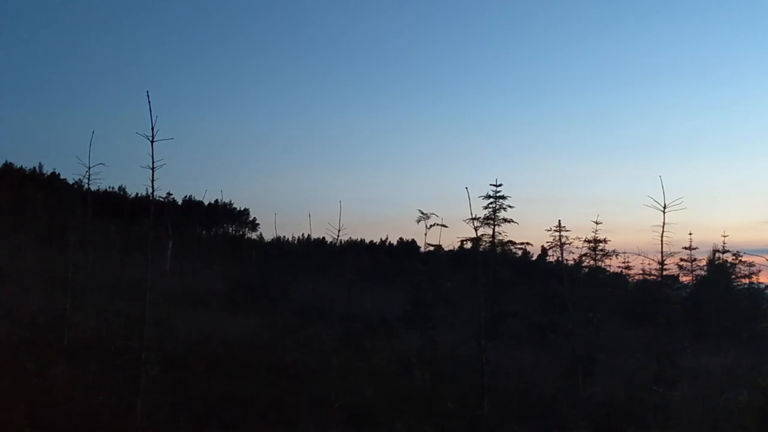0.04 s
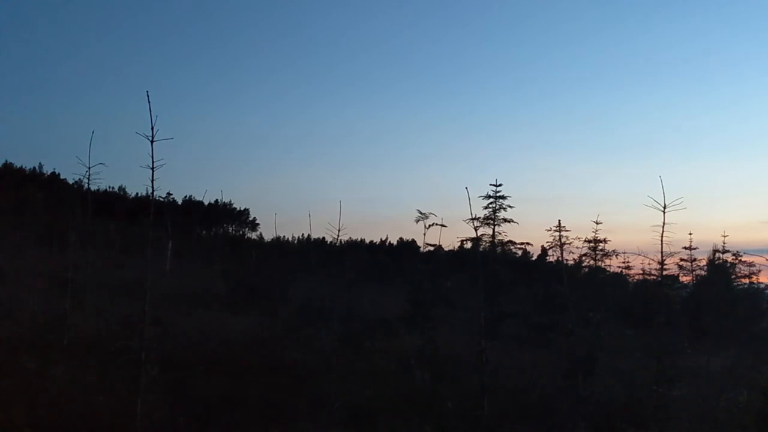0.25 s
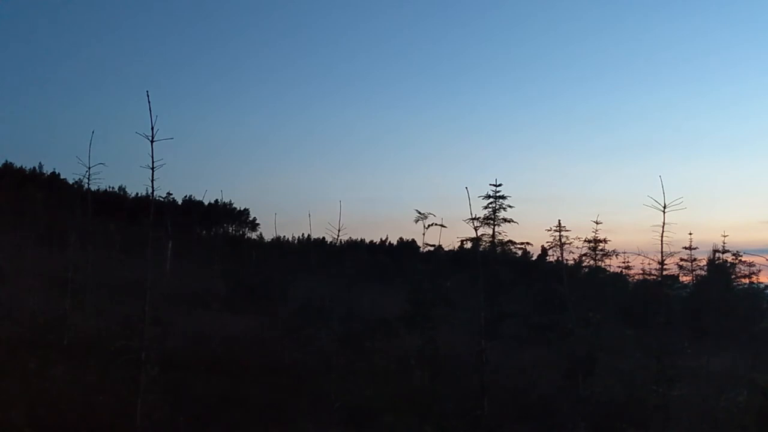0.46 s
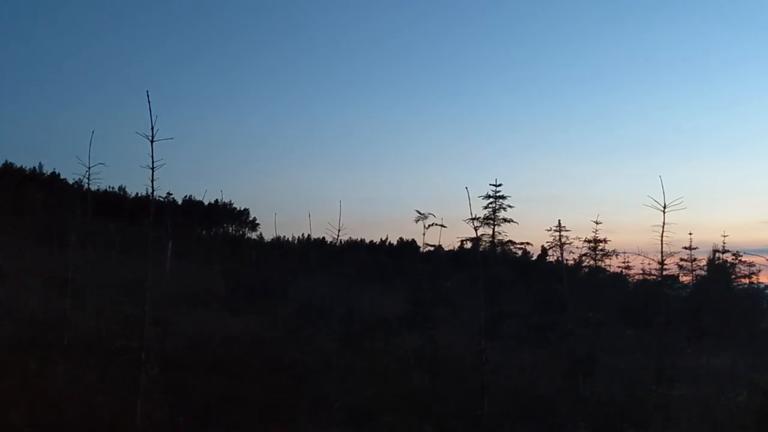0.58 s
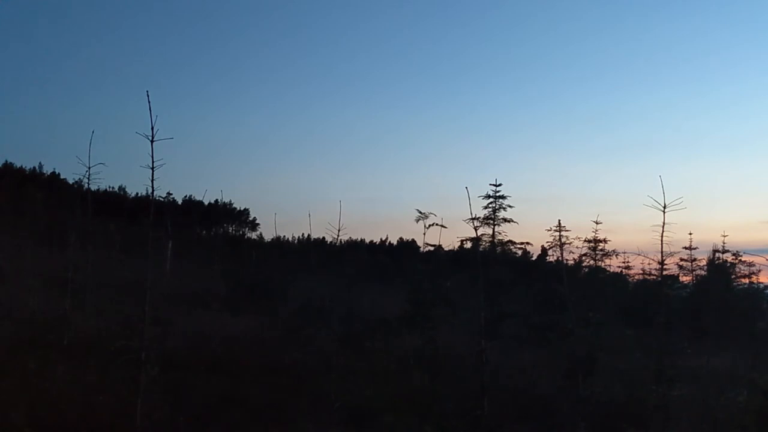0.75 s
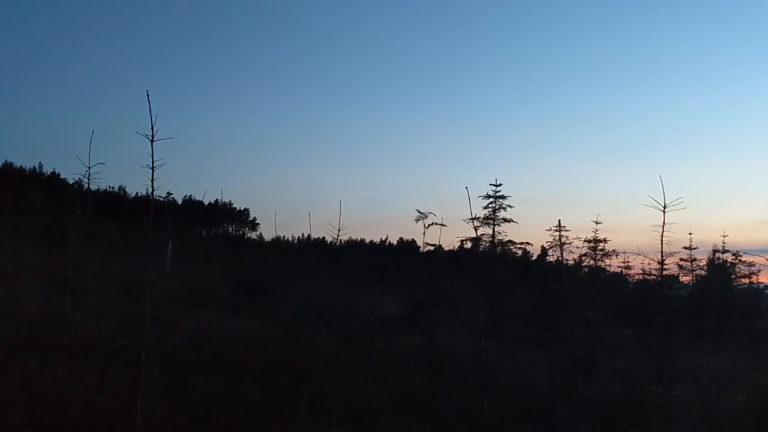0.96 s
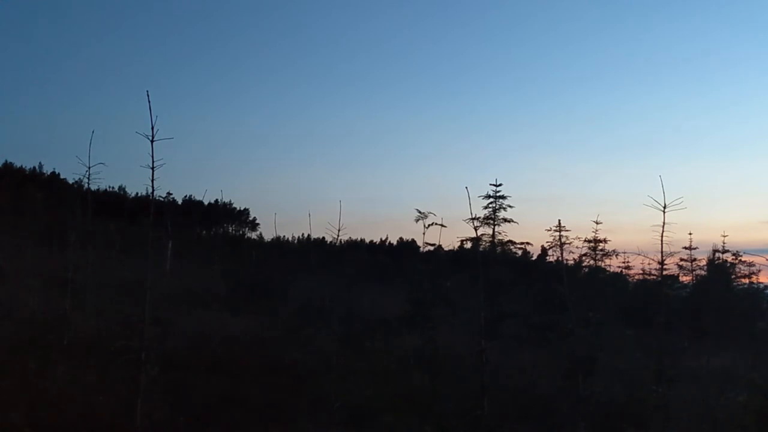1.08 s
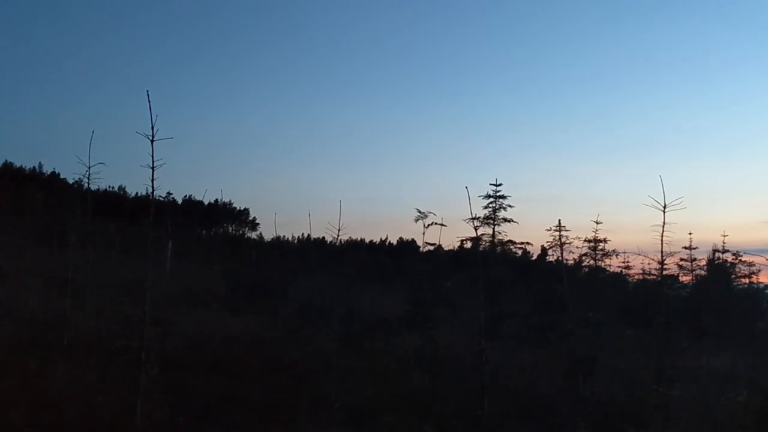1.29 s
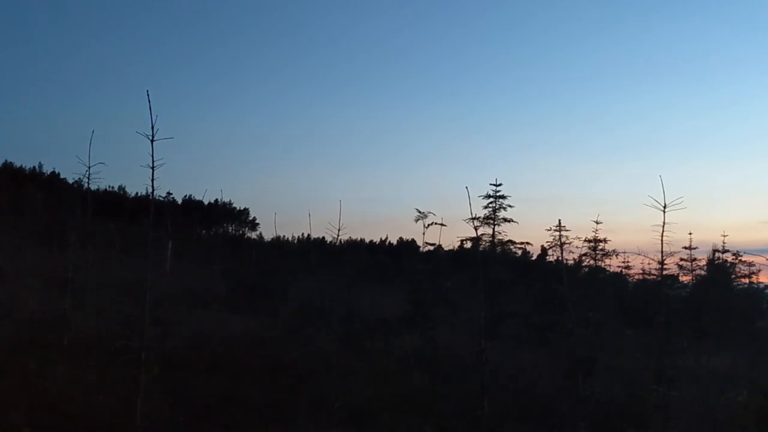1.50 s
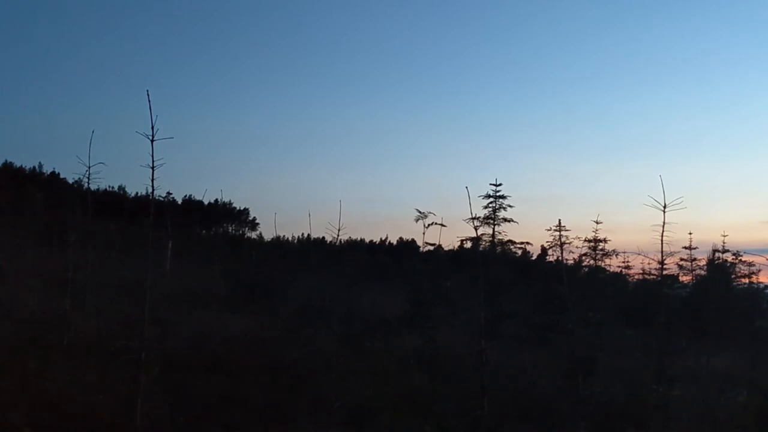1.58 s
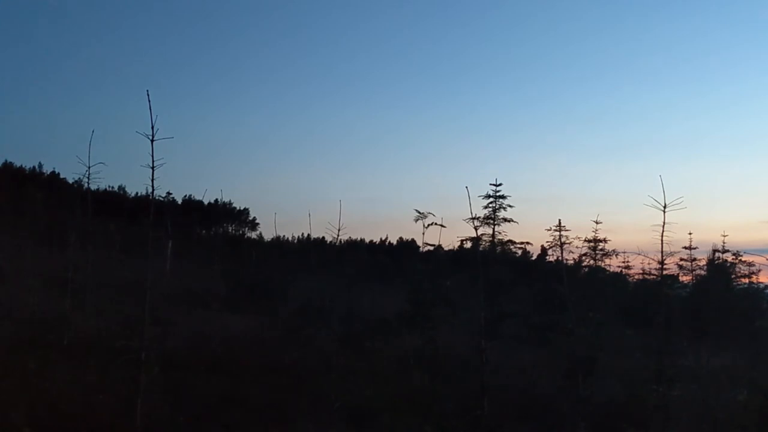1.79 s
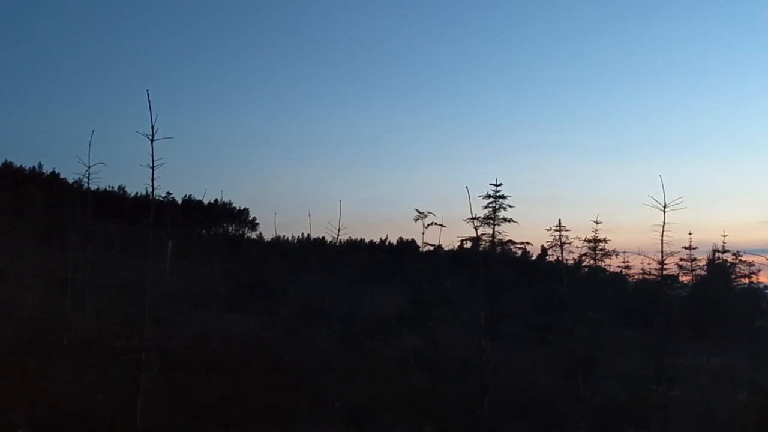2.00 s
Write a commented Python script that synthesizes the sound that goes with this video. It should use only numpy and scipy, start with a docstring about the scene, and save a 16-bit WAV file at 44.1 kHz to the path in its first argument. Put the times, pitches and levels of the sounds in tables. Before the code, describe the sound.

A nightjar churs throughout the two seconds, a quiet, rapid, mechanical trill that grows slightly fuller and echoes lightly among trees. Low wind puffs buffet the microphone's left side, strongest from 0.4 to 0.8 seconds and gone by 1.5. At 0.5 seconds the sound cuts out for an instant and crackles. A faint knock comes near 1.2 seconds, with tiny ticks until 1.8, over soft hiss.

```python
"""A forest clearing at dusk. A nightjar churs: a train of short falling whistles that the trees
scatter back. Puffs of wind buffet the left microphone port with slowing eddies and die away.
The signal drops out once and crackles. A few small ticks and one light knock ring nearby,
over faint air, a brief stir of leaves and microphone hiss."""
import sys
import numpy as np
from scipy import signal
from scipy.fft import rfft, irfft, next_fast_len
from scipy.io import wavfile
from scipy.ndimage import uniform_filter1d, map_coordinates

SR = 44100
rng = np.random.default_rng(int(sys.argv[2]) if len(sys.argv) > 2 else 0)


def master_out(mix):
    """Clip the mix to full scale and print it as 16-bit PCM to the path in sys.argv[1]."""
    frames = np.transpose(np.atleast_2d(mix))
    ceiling = np.clip(frames, -1, 1)
    pcm = np.round(ceiling * 32767).astype(np.int16)
    wavfile.write(sys.argv[1], SR, pcm)


N = 90404

# Pace of the churr, a quick phrase and then a slower one: t/s, notes sung so far
CHURR_PACE = [(.0005, 0), (.0975, 4), (.1296, 5), (.1704, 6), (.2833, 9), (.4702, 14), (.6544, 19),
              (.8028, 23), (1.0275, 29), (1.2142, 34), (1.3975, 39), (1.5875, 44), (1.6975, 47),
              (1.8098, 50), (1.919, 53), (2.0305, 56)]
# Dynamics of the churr, soft and then full: t/s, level/dB
CHURR_LEVEL = [(0, -67.5), (.13, -66), (.22, -62), (.42, -63.5), (.62, -59.5), (.85, -60), (1.05, -59),
               (1.4, -57.5), (1.7, -59), (2.05, -61)]
# One full note, timed around its loudest instant: t/ms, f/Hz, relative level/dB
NOTE_SHAPE = [(-5.5, 2285, -49), (-5, 2270, -7), (-1.5, 1884, -4), (-0.5, 1775, 1.5), (1.68, 1600, -3),
              (2.5, 1297, -11), (6.5, 1150, -19.5), (8.5, 1400, -19)]


def nightjar():
    """Every note is one fast downward whistle; the train of them makes the churr."""
    full_db, shorter_per_db = -59.5, 0.07  # notes softer than full are shorter
    out = np.zeros(N)
    marks, sung = np.transpose(CHURR_PACE)
    times = np.interp(np.arange(sung[-1] + 1), sung, marks)
    ms, pitch_hz, shape_db = np.transpose(NOTE_SHAPE)
    t = np.arange(-SR // 100, SR // 75) / SR
    for s, (bend, accent, stretch) in zip(times, rng.standard_normal((len(times), 3))):
        note_db = np.interp(s, *np.transpose(CHURR_LEVEL))
        time_scale = np.exp(shorter_per_db * min(note_db - full_db, 0) + .06 * stretch)
        hz = np.interp(1000 * t, ms, pitch_hz) * (1 + 0.013 * bend)
        envelope_db = np.interp(1000 * t / time_scale, ms, shape_db, left=-np.inf, right=-np.inf)
        rough_db = 1.5 * wobble(t - t[0], rate=500)
        level = amp(note_db + envelope_db + 0.1 * accent + rough_db)
        add(out, s + t[0], level * np.sin(2 * np.pi * np.cumsum(hz) / SR))
    return out


def clearing(bird):
    """The direct sound reaches both ports; near trunks scatter it at once, the far trees for longer."""
    lead_s = np.array([[.5], [-.5]]) * 0.13e-3  # the left port hears it first
    direct = pan(db=-1) * filtered(bird, lambda hz: np.exp(2j * np.pi * hz * lead_s))
    near_trunks = amp(-17.5) * scatter(bird, t60=.04, predelay_s=.004)
    far_trees = amp(-10) * scatter(bird, t60=.58, predelay_s=.004)
    return direct + near_trunks + far_trees


def scatter(x, t60, predelay_s):
    """Many small reflections blur into a diffuse stereo tail at about unity gain."""
    t = np.arange(SR // 2) / SR
    tail = rng.standard_normal((2, len(t))) * amp(-60 * t / t60) * (t > predelay_s)
    return signal.fftconvolve(x[None], tail / np.linalg.norm(tail[0]), axes=1)[:, :N]


# Wind hits on the left port: t/s, level/dB, length/s, starting eddy rate/Hz
PUFF_HITS = [(0.012, -48, 0.098, 166.4), (0.057, -44, 0.036, 129.6), (.181, -43.5, 0.041, 182.6),
             (0.198, -35.5, 0.056, 126), (.238, -41.5, 0.051, 160), (0.267, -37.5, 0.034, 222),
             (0.328, -35, 0.068, 202), (0.369, -44.5, 0.068, 234), (0.394, -33.5, 0.0078, 375),
             (0.407, -26.5, 0.011, 318), (0.418, -38.5, 0.089, 145.3), (0.526, -21.5, 0.015, 129),
             (0.541, -36, 0.037, 274.4), (0.559, -27, 0.046, 142.6), (0.572, -41, 0.074, 291),
             (0.623, -35.5, 0.035, 257), (.651, -24, 0.034, 306), (.67, -23.5, 0.037, 148.7),
             (0.691, -32, 0.032, 284), (0.712, -25, 0.036, 205), (0.745, -35.5, 0.062, 270),
             (0.76, -31, 0.066, 139), (0.863, -42, 0.042, 225), (.871, -46, 0.032, 278),
             (.886, -36.5, 0.031, 125), (0.969, -48.5, 0.054, 231), (1.02, -51.5, 0.08, 158),
             (1.111, -35.5, 0.035, 231.5), (1.149, -43.5, 0.04, 204), (1.185, -47.5, 0.083, 115.7),
             (1.231, -48.5, 0.13, 184), (1.286, -55, 0.014, 240), (1.295, -36.5, 0.028, 121),
             (1.36, -41, 0.05, 110.7), (1.412, -47.5, 0.035, 125.5)]
# Colour of the fine turbulence on hard hits: f/Hz, relative level/dB
SPRAY_EQ = [(150, -20), (400, 7), (600, -5.5), (950, -17), (1400, -36), (3000, -46), (8000, -49),
            (15000, -41)]


def puffs():
    """Each puff is a short run of uneven eddies that slow down as it dies; hard ones add a spray."""
    attack_s, fall_db = 0.0074, 22.5  # the fall is reached after one length
    end_hz, sag_s, wobble_hz = 96.7, 0.0471, 264.5
    thumps, force, t = np.zeros(N), np.zeros(N), np.arange(SR // 4) / SR
    for s, db, length, first_hz in PUFF_HITS:
        hz = end_hz + (first_hz - end_hz) * np.exp(-t / sag_s)
        start_cycles = rng.random()
        uneven_hz = hz * np.exp(0.19 * wobble(t, wobble_hz))
        phase = 2 * np.pi * (start_cycles + np.cumsum(uneven_hz) / SR)
        rise = np.sin(np.pi / 2 * np.minimum(t / attack_s, 1)) ** 2
        level = rise * amp(db - fall_db * (t / length) ** 2 - 0.5 * wobble(t, wobble_hz))
        add(thumps, s, level * (np.sin(phase) + amp(-33) * np.sin(2 * phase)))
        add(force, s, level * (hz / (2 * end_hz)) ** 2)
    hardness = force / amp(-30)  # 1 in a hard puff
    spray = amp(-63.5) * hardness ** 1.63 * noise(SPRAY_EQ)[0]
    return thumps + spray


# Swell of the rumble under the puffs: t/s, relative level/dB
RUMBLE_SWELL = [(0, -49.5), (.14, -54.5), (.22, -51), (.42, -42.5), (.5, -51.5), (.56, -46), (.62, -42.5),
                (.68, -49), (.79, -45.5), (.84, -58.5), (.89, -39), (.95, -60.5), (1.15, -48.5),
                (1.38, -54), (1.48, -77), (1.58, -79), (1.66, -57), (1.76, -69), (2.05, -66)]
# Colour of that rumble: f/Hz, relative level/dB
RUMBLE_EQ = [(20, -22), (45, 1.5), (70, 13.5), (120, 0), (220, -13), (330, -33), (480, -42), (800, -36),
             (1200, -53), (2000, -90)]
# Swell of the murmur on the sheltered right port: t/s, level/dB
MURMUR_SWELL = [(0, -63.5), (.24, -65), (.32, -104), (.4, -56), (.52, -70), (.65, -60), (.7, -62),
                (.75, -62), (.86, -79), (.94, -54), (1.0, -75.5), (1.5, -80), (2.05, -76)]
# Colour of that murmur: f/Hz, relative level/dB
MURMUR_EQ = [(25, -19.5), (55, 3.5), (85, 13.5), (140, -0.5), (250, -34), (600, -44)]


def wind():
    """Puffs thump on the left port over a low rumble; the right port only murmurs."""
    left = puffs() + amp(curve(RUMBLE_SWELL) - 4.5) * eddies(RUMBLE_EQ)
    right = amp(curve(MURMUR_SWELL)) * eddies(MURMUR_EQ)
    return np.array([left, right])


def eddies(spectrum, window=900):
    """Low turbulence, levelled to an even strength."""
    turbulence = noise(spectrum)[0]
    power = uniform_filter1d(uniform_filter1d(turbulence ** 2, window), window)
    return turbulence / np.sqrt(abs(power) + 1e-9)


# Jumps of the left signal: t/s, level/dB
CRACKLE_HITS = [(0.5219, -37.5), (0.5296, -33.5), (0.5348, -39), (0.538, -28.5), (1.511, -53)]


def crackles():
    """Each crackle is a sudden step that sinks back to rest, with only a trace on the right."""
    decay_s = 0.0041
    left, t = np.zeros(N), np.arange(SR // 20) / SR
    for s, db in CRACKLE_HITS:
        add(left, s, amp(db) * np.exp(-t / decay_s))
    return np.array([left, amp(-38) * left])


# Small dry ticks: t/s, level/dB, f/Hz, t60/s, snap against ring/dB, left minus right/dB
TICK_HITS = [(1.1658, -71, 8160, 0.016, -8, -6), (1.3372, -62.5, 6000, 0.021, -13, 8),
             (1.4616, -67.5, 1265, 0.01, -4, 3), (1.513, -64, 1360, 0.0059, 4, 3),
             (1.5385, -62, 8430, 0.0076, 0, 3), (1.54, -62.5, 1710, .012, -8, 2),
             (1.808, -60, 8300, 0.0059, 0, -2)]
# Ring of a tick: pitch ratio, relative level/dB
TICK_RING = [(1, 0.5), (1.07, -6), (1.16, -5), (1.25, -18)]
# Ring of the knock: f/Hz, relative level/dB, t60/s
KNOCK_RING = [(464, -4, 0.055), (853, 10, 0.019), (995, 3, 0.018), (1580, 2, 0.0099), (2230, 2, 0.009)]


def ticks_and_knock():
    """Dry ticks and one light knock ring close to the microphone, their top end rolled off."""
    top_hz, knock_s = 11000, 1.1652
    out = np.zeros((2, N))
    for s, db, hz, t60, snap_db, pan_db in TICK_HITS:
        modes = [(hz * ratio, mode_db, t60) for ratio, mode_db in TICK_RING]
        add(out, s, amp(db) * pan(pan_db) * ring(modes, snap_db, snap_t60=0.013, snap_hz=hz))
    add(out, knock_s, amp(-63) * ring(KNOCK_RING, snap_db=0, snap_t60=.008, snap_hz=1200))
    return filtered(out, lambda hz: 1 / np.sqrt(1 + (hz / top_hz) ** 20))


def ring(modes, snap_db, snap_t60, snap_hz):
    """Damped modes with a brief snap of noise around snap_hz."""
    t = np.arange(SR // 10) / SR
    tone = sum(amp(db - 60 * t / t60) * np.sin(2 * np.pi * hz * t) for hz, db, t60 in modes)
    band_hz = snap_hz * 2 ** np.array([-0.2, 0.2])
    snap = signal.lfilter(*signal.butter(1, band_hz, "band", fs=SR), rng.standard_normal((2, len(t))))
    return tone + amp(snap_db - 60 * t / snap_t60) * unit(snap)


# Swell of the distant air: t/s, level/dB
AIR_SWELL = [(0, -78), (1.35, -75), (1.52, -71.5), (2.05, -70.5)]
# Colour of the air: f/Hz, relative level/dB
AIR_EQ = [(25, -8), (90, 5), (180, -2.5), (290, -2.5), (450, -11.5), (800, -17.5), (1500, -19.5),
          (3000, -24), (6000, -54)]
# Swell of the leaves: t/s, level/dB
LEAF_SWELL = [(0, -95), (.55, -92), (.68, -80.5), (.76, -78), (.85, -93), (1.05, -95), (2.05, -96)]
# Colour of the leaves: f/Hz, relative level/dB
LEAF_EQ = [(500, -22), (900, -2), (2500, -4), (7000, -4), (11000, -6.5), (15000, -16)]


def air_and_leaves():
    """A faint bed of air in the trees; leaves stir briefly in the strongest gust."""
    air = amp(curve(AIR_SWELL)) * noise(AIR_EQ, channels=2)
    leaves = amp(curve(LEAF_SWELL)) * pan(db=2.5) * noise(LEAF_EQ, channels=2)
    return air + leaves


# Colour of the hiss, played without its first and last rows: f/Hz, relative level/dB
HISS_EQ = [(1650, -31), (2800, 0.5), (3260, 1.5), (3850, 0), (4130, 0.5), (5320, 0), (7050, 2.5),
           (10700, -7), (13000, -0.5), (15100, -1), (15700, -3)]
# Stereo balance of the hiss: f/Hz, left minus right/dB
HISS_BALANCE = [(700, -7), (2400, 3.5), (4400, 0.5), (8000, 5.5), (11000, 4), (15000, 11)]


def microphone_hiss():
    """The microphones' own steady noise, brighter on the left."""
    hiss = noise(HISS_EQ[1:-1], channels=2)
    return amp(-74.5) * filtered(hiss, lambda hz: pan(along(HISS_BALANCE, hz)))


def amp(db):
    """Decibels to gain."""
    return 10 ** (np.asarray(db) / 20)


def unit(x):
    """Scale to rms 1."""
    return x / np.sqrt(np.mean(x ** 2) + 1e-20)


def along(points, hz):
    """Read (f/Hz, value) points at hz, on a log axis."""
    f, v = np.transpose(points)
    return np.interp(np.log(hz + 1), np.log(f + 1), v)


def curve(rows):
    """(t/s, value) points as one value per sample."""
    return np.interp(np.arange(N) / SR, *np.transpose(rows))


def wobble(t, rate):
    """A smooth random curve over the times t, rate knots a second."""
    return map_coordinates(rng.standard_normal(512), [t * rate], mode="wrap")


def pan(db):
    """Left and right gains for a level difference, left minus right."""
    return amp(np.array([[.5], [-.5]]) * db)


def filtered(x, response):
    """Shape x with a gain that depends on frequency."""
    m = next_fast_len(N + SR // 2)
    return irfft(rfft(x, m) * response(np.fft.rfftfreq(m, 1 / SR)), m)[..., :N]


def noise(spectrum, channels=1):
    """Coloured noise of rms 1, unrelated between channels."""
    return unit(filtered(rng.standard_normal((channels, N)), lambda hz: amp(along(spectrum, hz))))


def add(out, s, sound):
    """Mix a sound in at time s."""
    i = int(round(s * SR))
    lo, hi = max(i, 0), min(i + sound.shape[-1], N)
    if hi > lo:
        out[..., lo:hi] += sound[..., lo - i:hi - i]


def scene():
    """The full mix at the two microphone ports."""
    foreground = clearing(nightjar()) + wind() + crackles() + ticks_and_knock()
    return foreground + microphone_hiss() + air_and_leaves()


def record(dry):
    """The microphone cuts the deepest bass; the signal drops out for an instant and is band-limited."""
    low_cut_hz, top_hz = 35, 15850
    t = np.arange(N) / SR
    lean = signal.sosfilt(signal.butter(3, low_cut_hz, "high", fs=SR, output="sos"), dry)
    dropout = (t > .4885) & (t < .501)
    gate = np.maximum(uniform_filter1d(1. - dropout, size=30), amp(-28))
    return filtered(lean * gate, lambda hz: hz < top_hz)


dry = scene()
out = record(dry)
master_out(out)
```